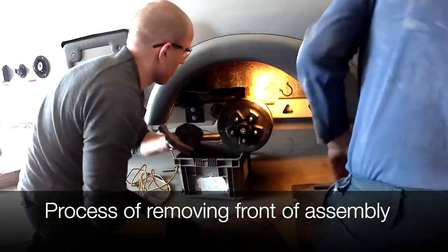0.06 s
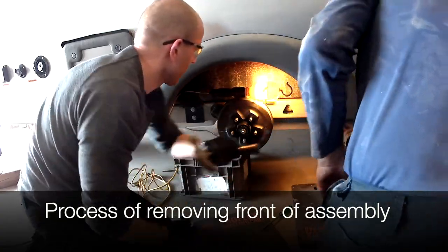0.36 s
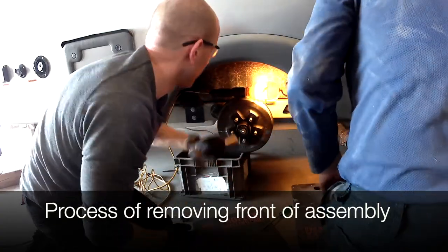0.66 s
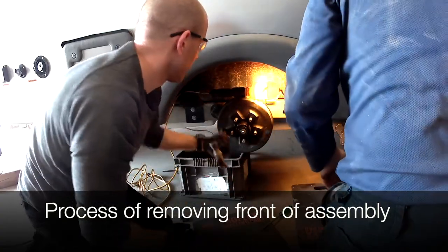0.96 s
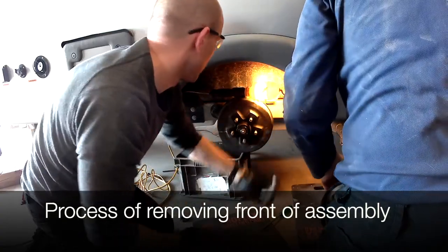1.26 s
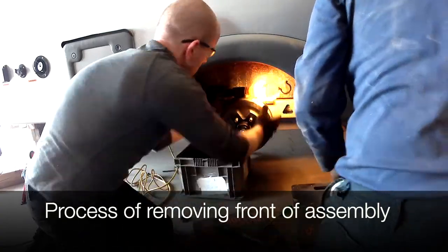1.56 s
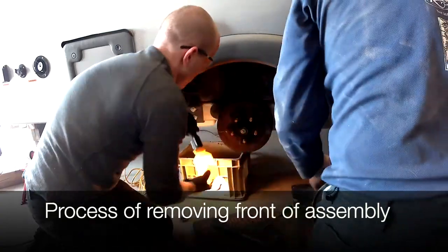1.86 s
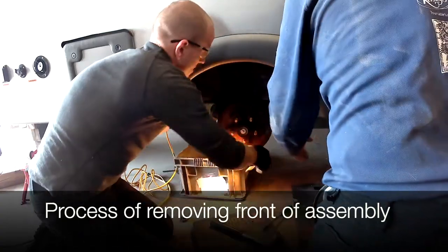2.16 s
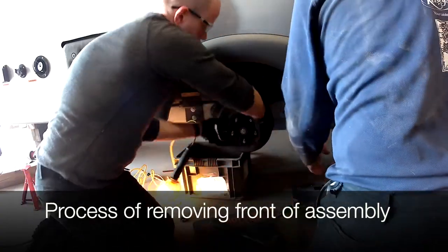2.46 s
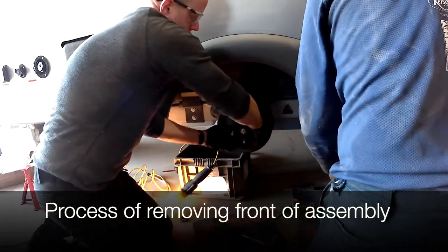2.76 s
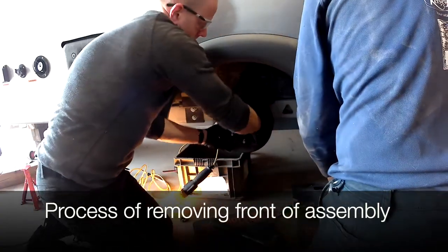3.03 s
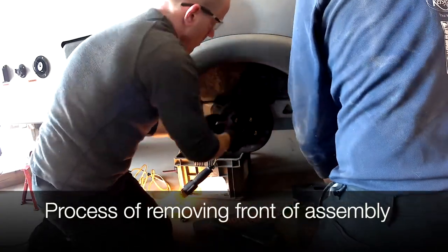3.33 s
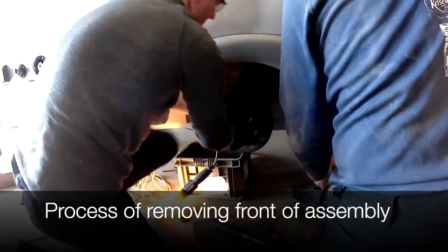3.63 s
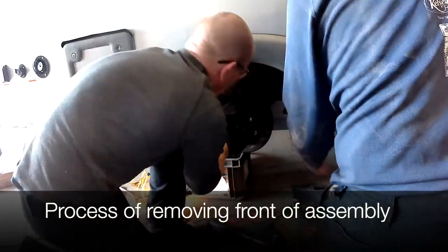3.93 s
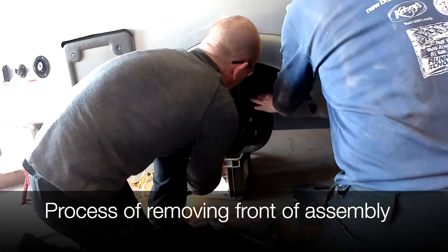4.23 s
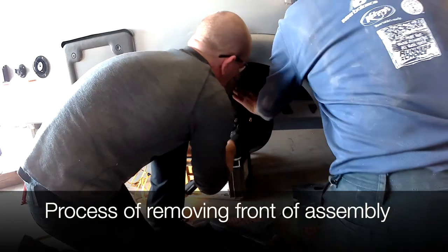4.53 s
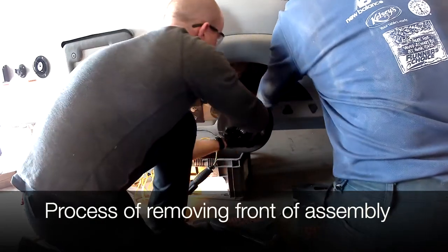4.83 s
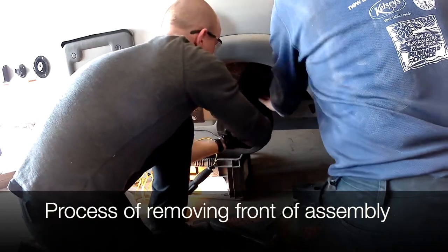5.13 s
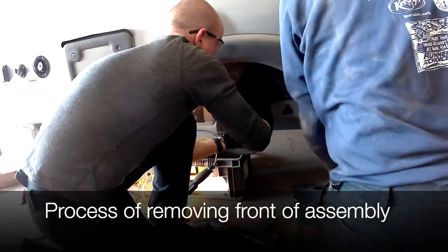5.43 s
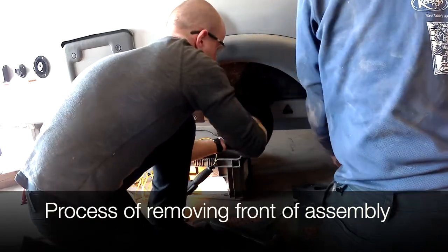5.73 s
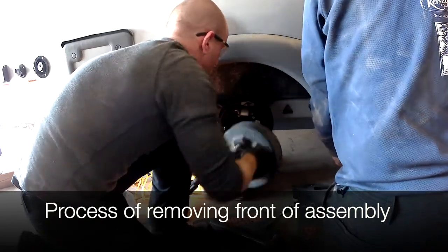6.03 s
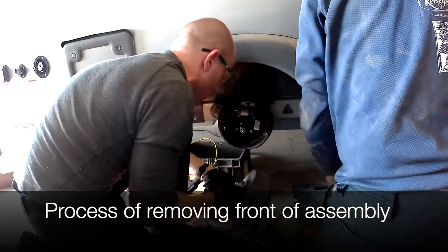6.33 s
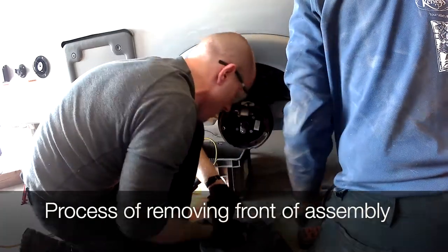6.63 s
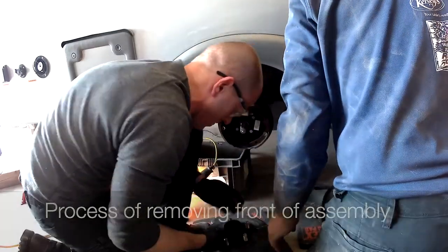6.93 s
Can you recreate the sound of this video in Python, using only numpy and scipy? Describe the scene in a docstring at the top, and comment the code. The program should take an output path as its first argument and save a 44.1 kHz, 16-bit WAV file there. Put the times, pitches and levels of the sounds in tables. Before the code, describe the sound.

In the first second a mallet strikes a stuck brake drum five times with dull, short clonks, each with a low boom from the car body and a faint trickle of rust. A few light clacks follow. From about 1.8 to 2.4 seconds tools tumble and scrape in a hollow plastic crate, with a bright steel clank. Between 2.5 and 2.9 seconds the loose drum clacks on its studs, then there is a lull with faint scuffs. Handling resumes at 4 seconds, with a dull knock at 4.5. From 4.8 to 5.8 hard clacks, short scrapes and low thumps grow louder as the drum works off. Soft scuffs follow. At 6.4 its rim drags briefly and it lands on concrete with a short, bright ring. A small steel part clinks at 7 seconds. The garage echoes briefly over a quiet, steady rumble.

```python
"""Taking off a brake drum

In a garage, a mallet knocks a brake drum loose, rust trickles down, and the mallet is put down
among tools in a plastic crate. The drum is rocked on its studs, clatters off the hub, drags and
lands ringing on the concrete; a small steel part clinks. Every push booms in the axle and car body.
Blows are fading noise plus ringing tones, scrapes are grainy noise, and the walls echo briefly."""
import sys
import numpy as np
from scipy import signal
from scipy.fft import rfft, irfft
from scipy.io import wavfile
from scipy.ndimage import map_coordinates

SR = 44100
rng = np.random.default_rng(int(sys.argv[2]) if len(sys.argv) > 2 else 0)


def master_out(mix):
    """Clip the mix to full scale and print it as 16-bit PCM to the path in sys.argv[1]."""
    frames = np.transpose(np.atleast_2d(mix))
    ceiling = np.clip(frames, -1, 1)
    pcm = np.round(ceiling * 32767).astype(np.int16)
    wavfile.write(sys.argv[1], SR, pcm)


N = 317079

# Levels are relative: each source also has its own gain. A harder blow sounds brighter.
# Blows on the mounted drum: t/s, level/dB, hardness/(dB per octave), jolt to the axle/dB
MALLET_KNOCKS = [(0.04, -31.5, 1.95, -33), (0.345, -31, -1.4, -29), (0.585, -28, 0.64, -26.5),
                 (0.818, -28, 1, -24), (1.032, -36.5, -2.5, -27), (4.487, -30.5, 1.1, -33.5)]  # the mallet and similar dull knocks
DRUM_CLACKS = [(0.873, -41.5, 1, -43), (1.255, -50.5, -3, -51), (1.355, -47, 3, -57),
               (1.448, -59, -0.5, -63), (1.531, -56.5, 0.5, -64), (2.483, -40, 0, -43),
               (2.5, -35.5, -1.5, -28.5), (2.627, -48.5, -2.5, -42.5), (2.646, -45.5, -1.4, -39.5),
               (2.729, -45.5, -1, -47), (2.747, -37, 0, -34), (2.766, -42, -2, -43),
               (2.822, -39.5, -2.5, -36), (4.041, -50.5, 0.8, -43), (4.086, -47, -3.2, -44),
               (4.873, -46, -2.5, -41), (4.954, -43.5, -3.5, -40.5), (4.992, -34, 1.5, -41.5),
               (4.999, -35.5, -4.5, -37.5), (5.143, -50, -4.7, -45), (5.214, -51.5, -5.5, -45.5),
               (5.291, -40.5, 3, -41.5), (5.332, -34.5, 1.8, -42), (5.502, -33.5, 0.9, -37.5),
               (5.573, -31, 1.6, -37), (5.677, -26.5, 1, -39.5), (5.759, -31.5, -2, -29)]  # the loose drum against studs and brake shoes
# Other blows: t/s, level/dB, hardness/(dB per octave)
AXLE_HEAVES = [(1.096, -40.5, -5), (2.556, -42, -9.5), (4.461, -40.5, 1.5), (4.838, -51.5, -0.5),
               (5.113, -43, 0), (5.249, -39.5, 1), (5.443, -45.5, 3)]  # pushes with no metal contact
CRATE_HITS = [(1.829, -53, -3.5), (1.86, -53, -4.5), (1.927, -43.5, -4.5), (1.941, -42.5, -4.5),
              (1.957, -40.5, -1.7), (1.966, -38.5, -0.5), (1.993, -40.5, 0.2), (2.216, -44.5, 0.4),
              (2.262, -40, -0.4), (2.293, -48, -2.7), (2.321, -45, -1.5), (2.342, -46.5, -5),
              (2.371, -48.5, 0), (2.434, -40.5, -5)]  # tools against the crate
TOOL_HITS = [(1.967, -40, 0.5), (1.993, -49.5, -0.5)]  # tool against tool
PART_HITS = [(6.983, -48.5, 0.5)]  # the small part on the floor
DRUM_LANDINGS = [(6.501, -25, 0), (6.506, -30.5, 0.5), (6.554, -36.5, -1)]  # the drum on the floor
# Sliding metal, scuffing gloves and shoes: t/s, length/s, midway level/dB, swell/dB, centre f/Hz
SLIDES = [(1.834, 0.1, -52, 9, 450), (2.219, 0.22, -49.5, -2.5, 590), (2.25, .14, -53, -8, 5000),
          (2.419, 0.052, -34.5, -12, 1100), (3.21, 0.064, -65.5, -8, 2200), (3.335, 0.094, -69, -6, 6140),
          (4.035, .045, -53, -4, 4800), (4.14, .13, -63, -10, 900), (4.271, 0.074, -66.5, -7, 5000),
          (4.6, 0.21, -66, -6, 3200), (4.44, 0.053, -49.5, 21, 600), (4.845, .08, -52.5, 3, 1380),
          (4.983, 0.042, -36, -4, 1180), (5.239, 0.055, -44, -2, 3000), (5.59, 0.057, -50.5, -17, 1000),
          (5.744, 0.059, -33.5, -3, 368), (5.926, 0.089, -52, -8, 1000), (5.936, 0.063, -58, -2, 4500),
          (6.018, 0.051, -59.5, -8, 5000), (6.136, 0.069, -51.5, -4, 1000), (6.2, 0.11, -61, -6, 1000)]

# The drum is first STUCK on the hub, then LOOSE on its studs, then FREE of the car.
# Tones a struck object rings with: f/Hz, level/dB, t60/s (time to fade by 60 dB)
AXLE_TONES = [(36.64, -9.5, 1), (66.2, -4, 0.42), (87.6, 2, 0.43), (109.4, -12, 0.75), (155, 2.5, .22)]
CRATE_TONES = [(356, -4, 0.12), (368, 8, 0.1), (430, -0.5, 0.12), (757, 1.5, 0.058), (1240, 0, 0.12),
               (2580, -5, 0.091), (2920, 0.5, .15), (3120, -4, .15)]
TOOL_TONES = [(2443, 1, 0.043), (2760, 0, 0.081), (3040, 0.5, 0.072), (3320, -3, 0.068)]
PART_TONES = [(754, -1, 0.074), (1847, -9, 0.2), (2950, -5, 0.29), (2884, -1, 0.15), (4106, 2, 0.22),
              (4150, 1, 0.16), (5570, -14.5, .18), (6500, -11, 0.16)]
STUCK_TONES = [(355.3, -9, .16), (490.8, -6, 0.2), (561.6, -2.5, 0.15), (689, 8, 0.074),
               (738.6, 1.5, 0.1025), (787, 0.5, .12), (971, -7, 0.12), (1235, -30, 0.16),
               (1610, -25.5, 0.11), (1760, -26, 0.29), (2580, -13, 0.099), (3950, -20.5, 0.16),
               (4070, -10, 0.048), (4440, -16.5, 0.13)]
LOOSE_TONES = [(908.6, 0, 0.1), (1285, -3.5, 0.13), (1577, -1, 0.064), (1790, 1, 0.071),
               (1983, -10.5, 0.051), (2460, -9, 0.061), (2710, 1.5, 0.051), (3217, -2, 0.03),
               (3400, -20.5, 0.098), (3700, -2, 0.048), (4090, 4, 0.046), (5470, -12, 0.056),
               (6950, -11.5, 0.043)]
FREE_TONES = [(769, 2.5, 0.13), (956, -6.5, 0.089), (1244, -2, .16), (1300, 1, 0.099), (1850, -4.5, 0.13),
              (2306, -4, 0.14), (2630, -6.5, 0.1), (2860, 2, .16), (2760, 3.5, 0.13), (2960, -3, 0.13),
              (3800, -1, 0.15), (4150, -2, 0.13), (4060, -0.5, .15), (5490, 3, 0.13), (5710, -5.5, .14),
              (6680, -15.5, .15), (7300, -23.5, .15)]
# Tones ringing in the drag: f/Hz, rough width/Hz, level/dB
DRAG_TONES = [(402, 51, -1), (745, 79, -4), (1230, 150, -12), (1596, 71, -0.5), (1867, 38, -1.5),
              (2700, 59.6, -9.5), (3470, 11, -3), (3575, 25, 0.5), (4000, 23, -17)]

# Colour of each source's noise, from bass to treble: f/Hz, level/dB
AIR_COLOUR = [(12, -34.5), (20, -1.5), (95, -6.5), (191, -11), (264, -14), (817, -23.5), (1190, -27),
              (1420, -27.5), (4970, -40), (6900, -45), (8000, -65), (11000, -90.5)]
SLIDE_COLOUR = [(150, -33), (300, -8.5), (380, -3), (550, -4.5), (950, -2), (1400, -7), (2100, -2.5),
                (3500, -5.5), (5200, -16.5), (7000, -24.5), (8000, -59.5)]
RUST_COLOUR = [(300, -14), (900, 3), (2500, 0.5), (4200, -5), (7000, -15), (8000, -35)]
CAR_BODY_COLOUR = [(15, -27.5), (33, -5), (52, -5.5), (85, 2), (160, -1.5), (210, -10.5), (300, -21),
                   (600, -48.5), (1500, -100)]
CRATE_COLOUR = [(90, -18), (170, -23.5), (260, -5), (309, -28), (362, -2.5), (510, -15), (773, -15.5),
                (986, -16.5), (1140, -15), (2270, -16.5), (2810, -14.5), (3020, -24), (3430, -16.5),
                (5430, -36), (6830, -37.5), (8000, -64), (10400, -86), (17600, -120)]
PART_COLOUR = [(200, -11.5), (500, -5), (750, 0), (1200, -15), (1850, -0.5), (2350, -9), (2880, 4),
               (3450, -14), (4150, 4), (4900, -20), (5650, -15), (6200, -24), (6800, -13), (8000, -28),
               (11000, -86)]
STUCK_COLOUR = [(160, -39), (270, -9), (349, -6), (497, -7.5), (614, -9), (688, -1.5), (839, -9.5),
                (995, -9), (2080, -21.5), (2650, -21.5), (3320, -28.5), (4170, -25.5), (6470, -39),
                (7240, -43.5), (8000, -68), (10400, -92), (17600, -120)]
LOOSE_COLOUR = [(140, -32.5), (240, 2), (373, 1.5), (444, -3), (623, -1.5), (711, -5.5), (926, -7),
                (1070, -9.5), (1280, -8.5), (1420, -8.5), (2100, -11), (3840, -10.5), (4380, -13.5),
                (6510, -24.5), (8000, -49.5), (10400, -70), (17600, -120)]
FREE_COLOUR = [(70, -14.5), (150, -28), (250, -12), (415, -12), (710, 3.5), (1010, -6.5), (1290, -6),
               (1960, -8.5), (2860, 5), (3300, -8), (4110, -1), (5100, -22), (5570, -7.5), (6250, -28.5),
               (6820, -19.5), (8000, -35), (10400, -61.5), (17600, -120)]

# Frequency bands in which a blow's level is set: lower f/Hz, upper f/Hz
BANDS = [(220, 600), (600, 1400), (1400, 3400), (3400, 8000)]
BASS_BANDS = [(25, 120), (120, 260)]
# What each object gives off at hardness 0: level/dB for each band, low to high
AXLE_VOICE = [0, 0]
CRATE_VOICE = [3, -3, 0.5, -0.5]
TOOL_VOICE = [-6, -8, 13.5, -4]
PART_VOICE = [-8.5, 0, 5, 3.5]
STUCK_VOICE = [5, 7, -3, -8]
LOOSE_VOICE = [0, -0.4, 0.85, -.5]
FREE_VOICE = [-11.5, 3, 5, 4]
# How long the garage echoes: f/Hz, t60/s
ECHO_TIMES = [(80, 0.71), (250, 0.43), (800, 0.32), (2500, 0.34), (5000, 0.26), (8000, 0.29)]


def amp(db):
    """Turn decibels into a gain."""
    return np.exp(np.asarray(db) * (np.log(10) / 20))


def unit(x):
    """Scale a signal to an average (rms) level of 1."""
    return x / np.sqrt(np.mean(x ** 2) + 1e-20)


def value_at(points, hz):
    """Read between the rows of a (frequency, value) table, on a scale of octaves."""
    freqs, values = np.transpose(points)
    return np.interp(np.log(hz + 1), np.log(freqs + 1), values)


def coloured(x, colour):
    """Filter a sound so that its bass and treble follow a colour table."""
    size = 8192
    gains = amp(value_at(colour, np.fft.rfftfreq(size, 1 / SR)))
    cepstrum = irfft(np.log(gains + 1e-6))
    # folding onto the first half keeps the filter from ringing before a blow
    cepstrum[1:size // 2] *= 2
    cepstrum[size // 2 + 1:] = 0
    return signal.fftconvolve(x, irfft(np.exp(rfft(cepstrum))))[:len(x)]


def wobble(rate):
    """A smooth curve through `rate` random points a second."""
    points = rng.standard_normal(int(N * rate / SR) + 4)
    return map_coordinates(points, [np.arange(N) * rate / SR])


def add(track, start, sound):
    """Mix a sound into the track at `start` seconds."""
    part = track[max(round(start * SR), 0):][:len(sound)]
    part += sound[:len(part)]


def garage(x, echo_db):
    """The direct sound plus a wash of echoes that builds up quickly from the near walls."""
    hz, t, noise = signal.stft(rng.standard_normal(SR // 2), SR, nperseg=256)
    decay = amp(-60 * t / value_at(ECHO_TIMES, hz)[:, None])
    build_up = 1 - np.exp(-t / 0.0042)
    tail = signal.istft(noise * decay * build_up, SR, nperseg=256)[1]
    return x + amp(echo_db) * signal.fftconvolve(x, tail / np.linalg.norm(tail))[:len(x)]


def friction():
    """Rough surfaces catch and slip in tiny uneven grains."""
    return rng.standard_normal(N) * amp(3 * wobble(300) + 3.3 * wobble(43))


def stroke(start, length, db, swell_db, fade_s=0.016):
    """The gain of one scrape: it fades in, swells or dies away evenly, and fades out."""
    t = np.arange(N) / SR - start
    fade = np.clip(np.minimum(t, length - t) / fade_s, 0, 1)
    return fade * amp(db + swell_db * (np.clip(t / length, 0, 1) - 0.5))


def struck(tones, colour, ring_db, crack_db, noise_t60, attack_s, scatter_db, detune):
    """One blow: a crack, noise for a crowd of fast-dying vibrations, and a few tones that ring on."""
    t = np.arange(SR // 2) / SR
    hz, db, t60 = np.transpose(tones)[:, :, None]
    # the spot that is hit picks the tones, and its grip shifts their pitch
    tone_db = db + scatter_db * rng.standard_normal(db.shape) - 60 * t / t60
    pitch = hz * (1 + detune * rng.standard_normal(hz.shape))
    phase = 2 * np.pi * (pitch * t + rng.random(hz.shape))
    ring = np.sum(amp(tone_db) * np.sin(phase.astype(np.float32)), axis=0)
    crack = amp(crack_db - 60 * t / 0.008)
    noise = coloured(rng.standard_normal(len(t)) * (amp(-60 * t / noise_t60) + crack), colour)
    return (unit(noise) + amp(ring_db) * unit(ring)) * (1 - np.exp(-t / attack_s))


def blows(events, strike, voice, echo_db, bands=BANDS):
    """Blows on one object: harder ones are brighter, and a heavier jolt fills the lowest band."""
    track = np.zeros(N)
    onset = SR // 32  # band levels are set for this first part of each blow
    hz = np.fft.rfftfreq(onset, 1 / SR)
    centres = np.sqrt(np.prod(bands, axis=1))
    octaves = np.log2(centres) - np.log2(centres).mean()
    for start, db, hardness, *jolt_db in events:
        blow = garage(strike(), echo_db)
        power = 2 * np.abs(rfft(blow[:onset]) / onset) ** 2
        raw_db = 10 * np.log10([power[(hz > low) & (hz < high)].sum() for low, high in bands])
        wanted_db = db + np.array(voice) + hardness * octaves
        if jolt_db:
            wanted_db[0] = (wanted_db[0] + jolt_db[0]) / 2
        add(track, start, coloured(blow, list(zip(centres, wanted_db - raw_db))))
    return track


def room_air():
    """The quiet, steady rumble and hiss of the garage."""
    return amp(-62.5) * unit(coloured(rng.standard_normal(N), AIR_COLOUR))


def sliding():
    """Each slide rasps most around one frequency: low for a heavy rub, high for fine grit."""
    rasp = coloured(friction(), SLIDE_COLOUR)
    track = np.zeros(N)
    for start, length, db, swell_db, hz in SLIDES:
        span = slice(round(start * SR), round((start + length) * SR))
        colour = [(hz / 4, -20.5), (hz / 2, -12), (hz, 0), (hz * 2, -12), (hz * 4, -20.5)]
        gain = stroke(start, length, db, swell_db)[span]
        add(track, start, gain * unit(coloured(rasp[span], colour)))
    return amp(-3) * garage(track, echo_db=-6)


def falling_rust(rise_s=0.057, t60=0.74):
    """After each knock, flakes of rust trickle down inside the drum."""
    t = np.arange(SR) / SR
    trickle = (1 - np.exp(-t / rise_s)) * amp(-22.5 - 60 * t / t60)
    flow = np.zeros(N)
    for start, db, hardness, _ in MALLET_KNOCKS:
        add(flow, start, amp(db + hardness) * trickle)
    return garage(flow * unit(coloured(friction(), RUST_COLOUR)), echo_db=-5.5)


def part_clink():
    """A small steel part touches the floor lightly and rings for a moment."""
    strike = lambda: struck(PART_TONES, PART_COLOUR, ring_db=-5, crack_db=3,
                            noise_t60=0.11, attack_s=0.00084, scatter_db=2, detune=0.0027)
    return amp(-7) * blows(PART_HITS, strike, PART_VOICE, echo_db=-6)


def crate_thuds():
    """Tools tumble against the hollow plastic crate."""
    strike = lambda: struck(CRATE_TONES, CRATE_COLOUR, ring_db=-5.5, crack_db=2,
                            noise_t60=0.12, attack_s=0.00038, scatter_db=3.5, detune=0.034)
    return amp(-7.5) * blows(CRATE_HITS, strike, CRATE_VOICE, echo_db=-11)


def tool_clanks():
    """Steel on steel in the crate gives a bright clank."""
    strike = lambda: struck(TOOL_TONES, CRATE_COLOUR, ring_db=-0.5, crack_db=1,
                            noise_t60=0.11, attack_s=0.0007, scatter_db=1, detune=0.006)
    return amp(-7.5) * blows(TOOL_HITS, strike, TOOL_VOICE, echo_db=-12)


def axle_booms(lag_s=0.00595):
    """Heaves, and blows on the mounted drum a moment earlier, jolt the axle so the car body booms."""
    jolts = list(AXLE_HEAVES)
    for events, hardness_factor in [(MALLET_KNOCKS, 1.8), (DRUM_CLACKS, 0.089)]:
        for start, _, hardness, jolt_db in events:
            jolts.append((start + lag_s, jolt_db, hardness_factor * hardness))
    strike = lambda: struck(AXLE_TONES, CAR_BODY_COLOUR, ring_db=-3.5, crack_db=4.5,
                            noise_t60=0.1, attack_s=0.0021, scatter_db=-0.5, detune=0.023)
    return amp(-1.5) * blows(jolts, strike, AXLE_VOICE, echo_db=-8.5, bands=BASS_BANDS)


def stud_grating():
    """Before each clack the drum grates along the studs ever faster; a heavier pull is louder."""
    t = np.arange(SR // 40) / SR
    speed = np.zeros(N)
    for clack_time, _, _, jolt_db in DRUM_CLACKS:
        add(speed, clack_time - t[-1], amp(jolt_db - 60 * t[::-1] / 0.11))
    return amp(-8.5) * speed * unit(coloured(friction(), LOOSE_COLOUR))


def rim_drag():
    """Just before the drum lands it drags, and the scrape rings with a few tones."""
    rasp, song = friction(), np.zeros(N)
    for hz, width, db in DRAG_TONES:
        b, a = signal.iirpeak(hz, hz / (2 * width), SR)
        song += amp(db) * signal.lfilter(b, a, signal.lfilter(b, a, rasp))
    scrape = unit(song) + amp(-9.5) * unit(coloured(rasp, SLIDE_COLOUR))
    return garage(scrape * stroke(start=6.39, length=0.125, db=-48, swell_db=-4), echo_db=-5)


def drum_landing():
    """The freed drum meets the concrete, rocks once and rings."""
    strike = lambda: struck(FREE_TONES, FREE_COLOUR, ring_db=-3, crack_db=4.5,
                            noise_t60=0.098, attack_s=0.00055, scatter_db=3.5, detune=0.003)
    return amp(-9.5) * blows(DRUM_LANDINGS, strike, FREE_VOICE, echo_db=-15.5)


def drum_clatter():
    """The loose iron drum catches on steel with hard, short clacks."""
    strike = lambda: struck(LOOSE_TONES, LOOSE_COLOUR, ring_db=-4.5, crack_db=6,
                            noise_t60=0.11, attack_s=0.0008, scatter_db=3.5, detune=0.024)
    return amp(-7) * blows(DRUM_CLACKS, strike, LOOSE_VOICE, echo_db=-8)


def mallet_knocks():
    """The drum still grips the hub, so it answers the mallet with a dull, short clonk."""
    strike = lambda: struck(STUCK_TONES, STUCK_COLOUR, ring_db=-0.5, crack_db=1,
                            noise_t60=0.16, attack_s=0.0015, scatter_db=-1, detune=0.0059)
    return amp(-6.5) * blows(MALLET_KNOCKS, strike, STUCK_VOICE, echo_db=-12)


def scene():
    """Add all the sources into one channel."""
    drum = mallet_knocks() + falling_rust() + stud_grating()
    drum += drum_clatter() + rim_drag() + drum_landing()
    mix = drum + axle_booms() + crate_thuds() + tool_clanks() + part_clink() + sliding() + room_air()
    return mix[None]


def record(dry):
    """Cut away the treble above 8000 Hz."""
    return signal.sosfilt(signal.cheby1(14, 0.2, 8000, fs=SR, output="sos"), dry)


dry = scene()
out = record(dry)
master_out(out)
```